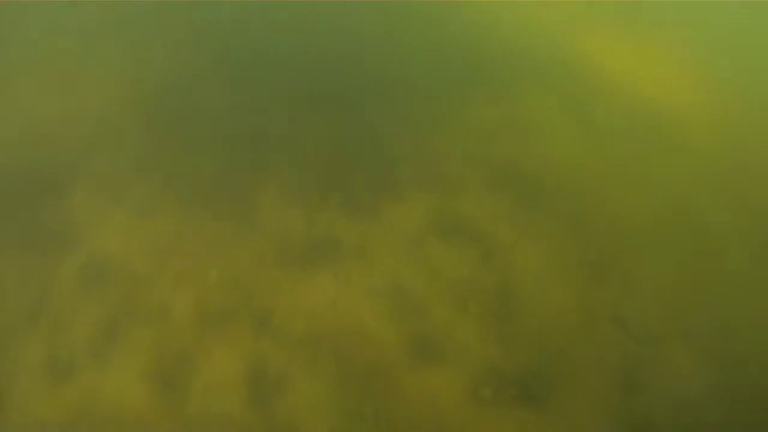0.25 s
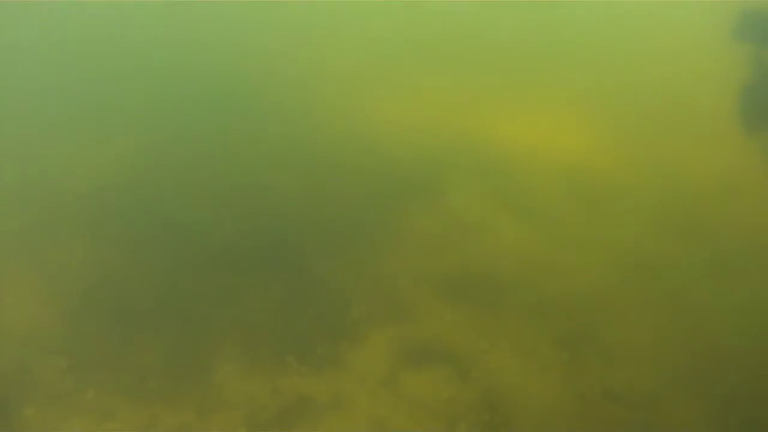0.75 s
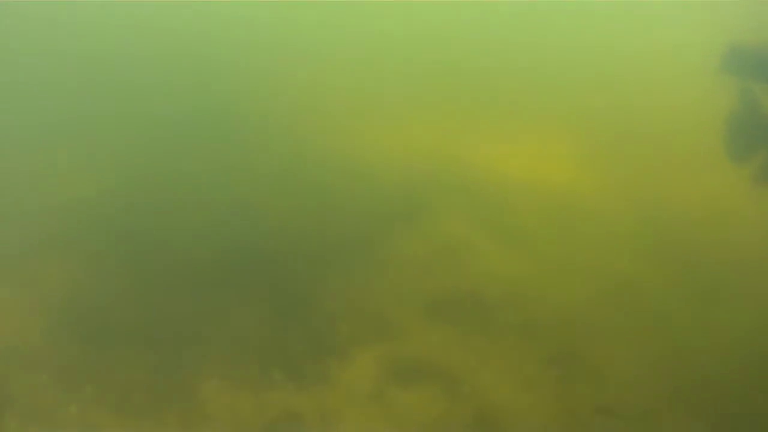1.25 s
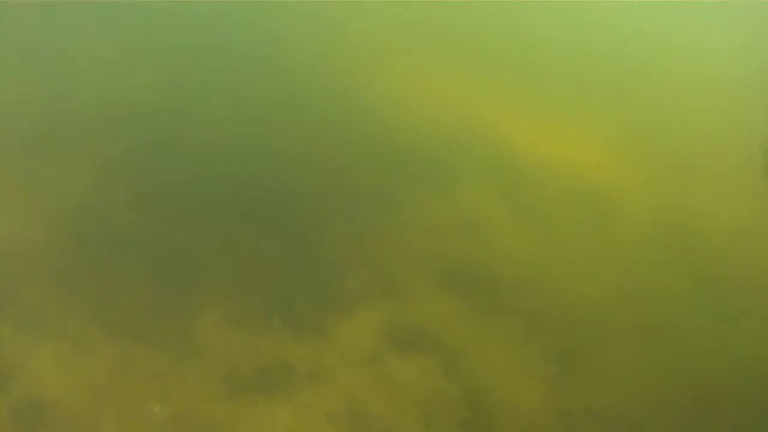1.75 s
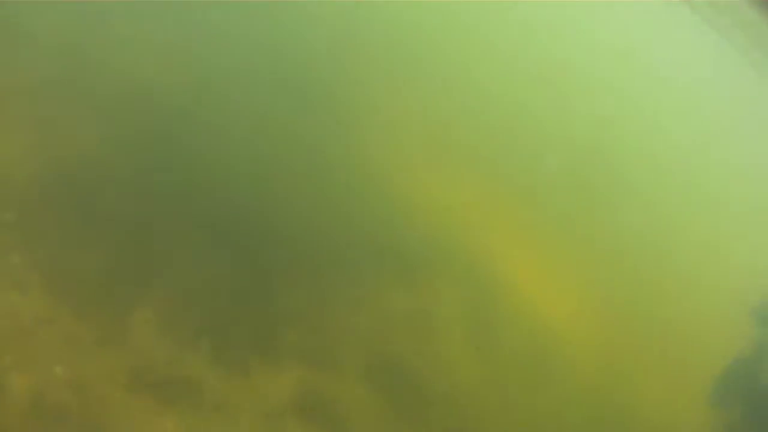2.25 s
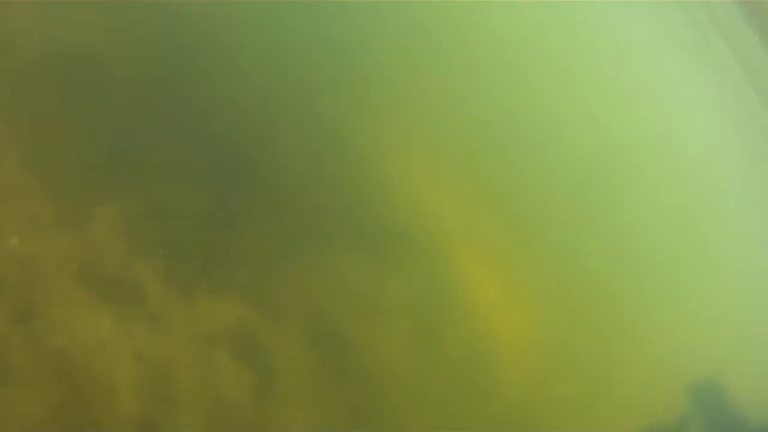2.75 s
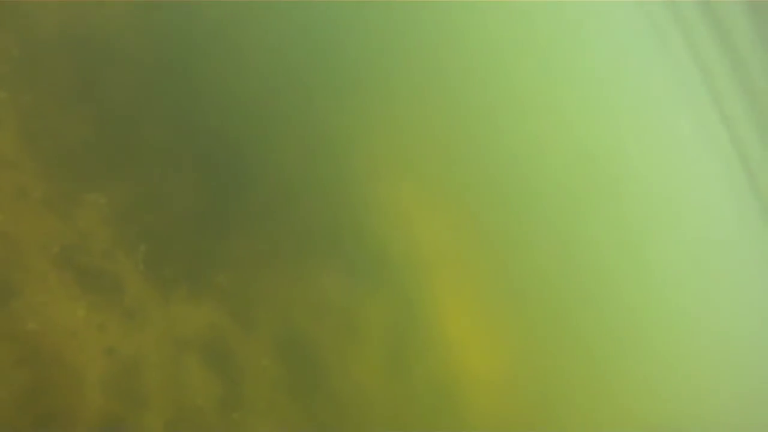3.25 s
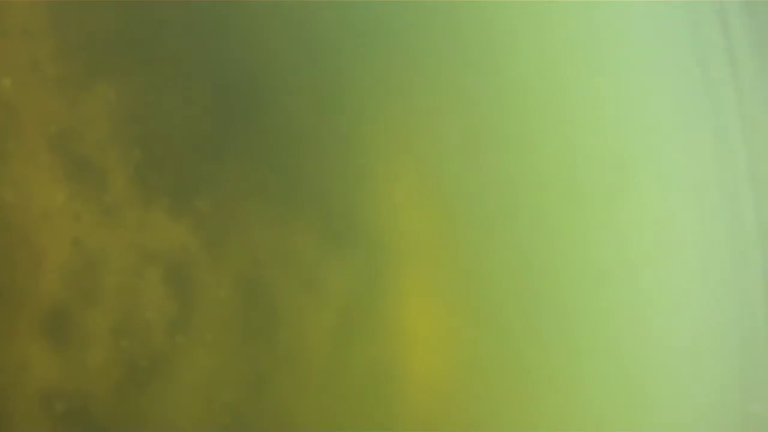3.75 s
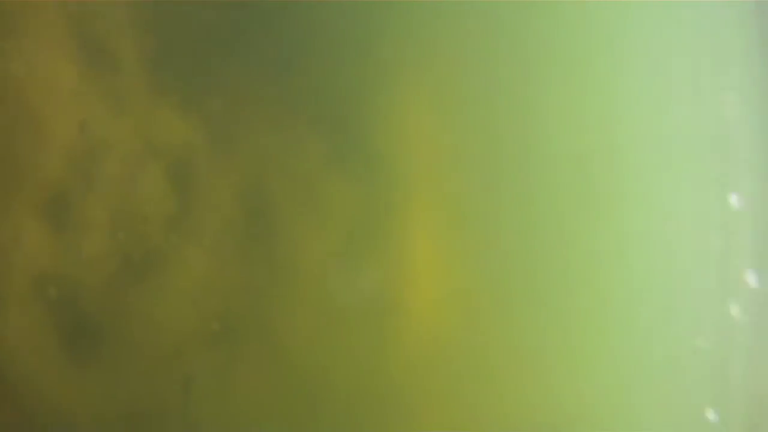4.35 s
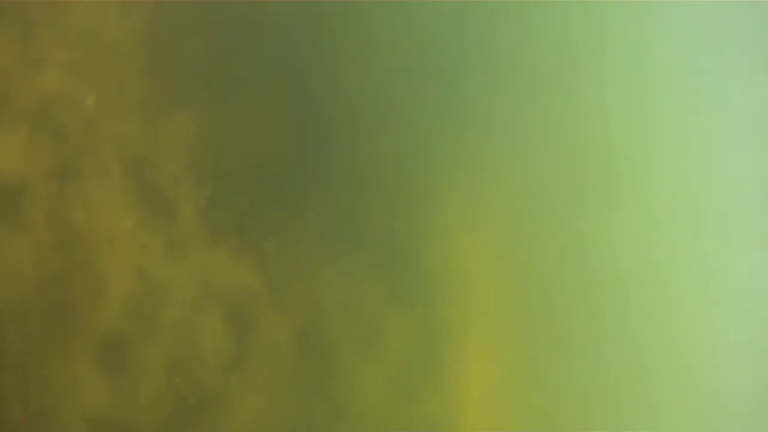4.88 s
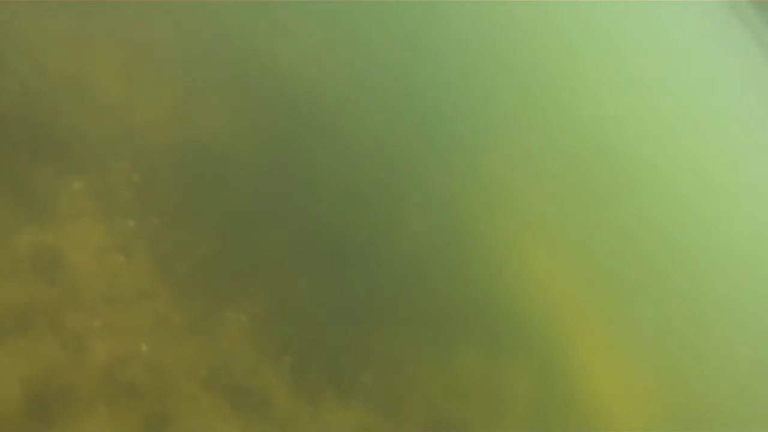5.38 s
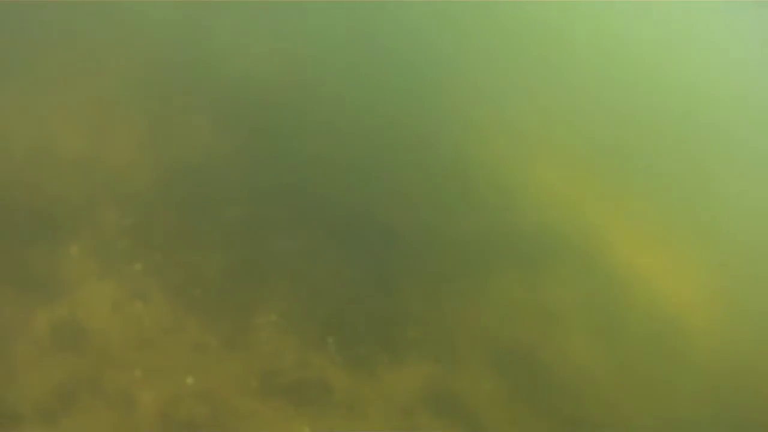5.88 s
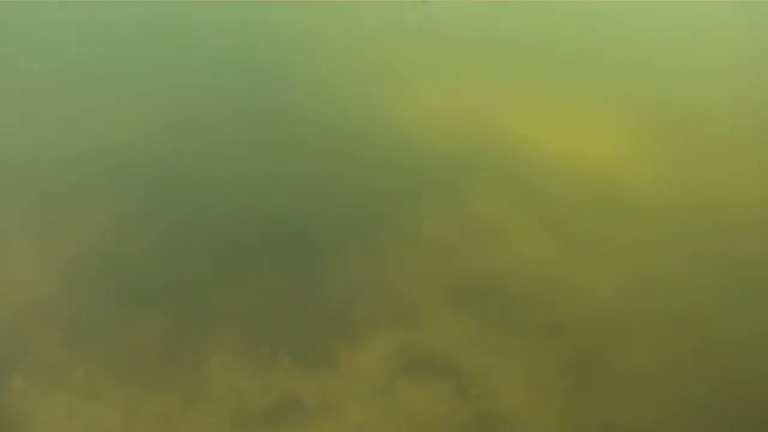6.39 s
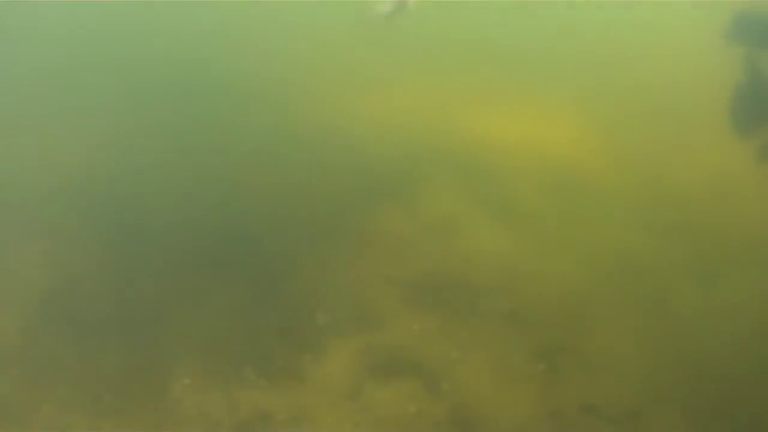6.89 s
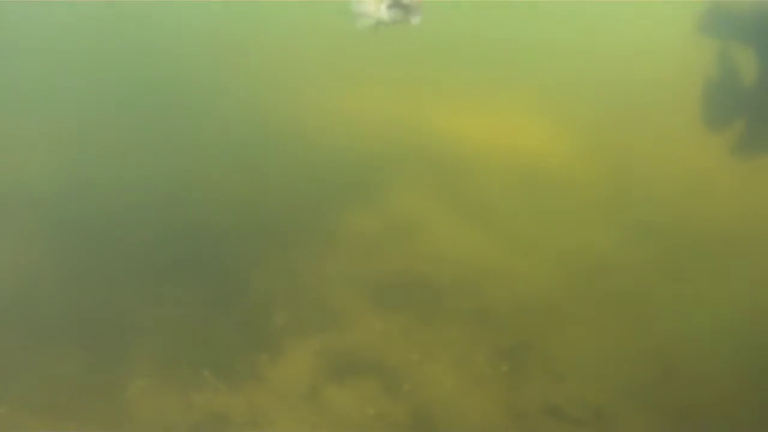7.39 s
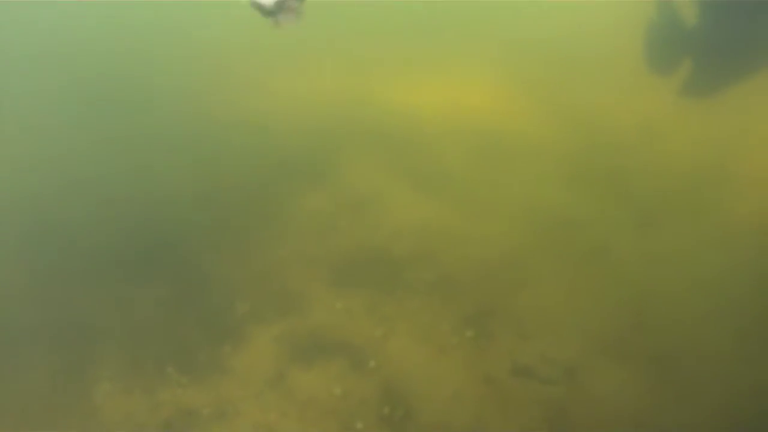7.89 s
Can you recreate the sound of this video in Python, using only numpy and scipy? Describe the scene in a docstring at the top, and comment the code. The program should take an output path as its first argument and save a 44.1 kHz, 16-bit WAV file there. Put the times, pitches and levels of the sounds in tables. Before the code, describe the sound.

Inside a sealed case held just underwater beside a dock, a very loud clipped pop comes almost at once, amid low bumps and wet scrapes. Sparse bubble plinks and knocks follow, with another sharp crack just after two seconds. A calmer middle of faint ticks and rumble gives way to busier pops and heavy thumps past six seconds, then quiet. The sound is close, boxy, low-fidelity, with glassy treble.

```python
"""Bubbles against a submerged case

A camera in a sealed case is held just under the water's surface beside a dock. Bubbles pop and ring against the
case as damped tones with noise splashes; noise-driven and struck modes make the grip's rubs and bumps. Moving
water rumbles and washes as shaped noise; a faint, dull flutter pulses about ten times a second. The coarse
recorder clips overloads and holds its slow samples, which mirrors the sound into a glassy treble."""
import sys
import numpy as np
from scipy import signal
from scipy.fft import rfft, irfft, next_fast_len
from scipy.io import wavfile
from scipy.ndimage import uniform_filter1d

SR = 44100
rng = np.random.default_rng(int(sys.argv[2]) if len(sys.argv) > 2 else 0)


def persist_wave(psi):
    """Save psi, clipped to +-1, as 16-bit WAV."""
    counts = np.round(np.clip(psi, -1, 1) * 32767).astype(np.int16)
    wavfile.write(sys.argv[1], SR, np.atleast_2d(counts).T)


N = 358533
TIME = np.arange(N) / SR  # s

# larger bubbles bursting at the case: onset t/s, mid-glide pitch f/Hz, short-term peak level/dB,
# ring decay t60/s, splash level/dB re the ring
BURSTS = [(0.2043, 1512, 10.5, 0.0098, -14), (0.2047, 940, 2.5, 0.017, -25), (0.2057, 396, 1, 0.0031, 3),
          (0.2954, 3610, -13, 0.022, -20), (0.3037, 1040, -17, .032, -17), (0.3408, 1880, -12, 0.011, -22),
          (0.5775, 3550, -34, 0.023, 1), (0.641, 3694, -17.5, 0.016, -9), (0.9108, 2670, -15, 0.0062, -1),
          (1.1138, 1070, -15, 0.029, -16), (1.1262, 1385, -2, 0.035, -1.5), (1.1311, 686, -7, 0.036, -11),
          (1.2792, 820, -28, 0.015, 1), (1.3758, 715, -20.5, 0.027, -6), (1.4015, 2200, 3, 0.0087, -16),
          (1.41, 2270, -14, 0.015, -35), (1.434, 2320, -5, 0.0067, 1.5), (1.4426, 2280, 0, .013, -0.5),
          (1.4502, 3600, -25, 0.014, 4), (1.4629, 620, -16, 0.014, -10), (1.5375, 2210, -25.5, .013, -1),
          (1.5683, 2120, -23.5, 0.014, -3), (1.6717, 486, -15.5, 0.056, -25),
          (1.6801, 670, -16.5, 0.036, -35), (1.7205, 506, -24, .069, -11), (1.7215, 990, -23.5, 0.022, -24),
          (1.8479, 952, -19.5, 0.05, -20), (2.0518, 1770, -19, 0.041, -26.5),
          (2.0934, 1175, -25, 0.11, 0.5), (2.1946, 3363, 6, 0.0094, -10), (2.2954, 2200, -25, .013, 4),
          (2.3355, 2860, -16, 0.025, -8), (2.39, 1090, -35, .025, 5), (2.4855, 690, -24, 0.028, -24),
          (2.7269, 2400, -28.5, 0.011, 4), (2.7866, 2360, -17, 0.011, -1.5), (2.8077, 1640, -26, 0.03, 6),
          (2.8286, 2494, -9.5, 0.015, 0.5), (2.8432, 2280, -18.5, 0.038, 5), (2.844, 4930, -22, .008, -14),
          (2.8603, 3850, -18.5, 0.019, 6), (2.8835, 840, -22.5, 0.052, -20), (2.8865, 2200, -18, 0.017, -1),
          (2.8901, 1250, -20.5, 0.024, -26), (2.9264, 2420, -11.5, 0.016, 0),
          (2.9961, 2400, -34.5, 0.012, 6), (3.5496, 2950, -20.5, 0.0095, 4.5),
          (3.6616, 2120, -27.5, 0.016, 1.5), (3.6983, 730, -25.5, 0.026, -3.5),
          (3.7745, 1620, -29, .032, 8), (4.3399, 3530, -25.5, 0.022, -5.5), (4.47, 1780, -33.5, .013, 9),
          (4.6058, 2285, -5.5, 0.026, -19), (4.6313, 2660, -21.5, 0.012, 7), (4.6383, 3910, -12, 0.015, 5),
          (4.649, 2150, -7.5, 0.019, -15), (4.6902, 616, -23, 0.045, 7), (4.7037, 2260, -24.5, 0.015, 1),
          (4.7199, 1950, -17.5, .03, -12), (5.3868, 936, -28.5, 0.02, -14.5),
          (5.6318, 1560, -29, 0.014, 12), (5.6717, 826, -20.5, 0.042, 2), (5.6719, 5130, -17, 0.0043, -30),
          (5.8711, 2640, -24, .013, -9.5), (6.2757, 2400, -27, .025, 6), (6.2852, 1195, -3, 0.025, -27),
          (6.3437, 3780, -23.5, 0.037, 2), (6.3525, 1730, -11.5, 0.014, -6), (6.3715, 2180, -6, 0.014, 12),
          (6.3749, 1580, -7, 0.015, 5), (6.3815, 4160, -11.5, 0.023, 1.5), (6.3874, 2300, -12, 0.017, 2),
          (6.4583, 5000, -20, 0.0035, -11.5), (6.6628, 793, -6, 0.036, -26), (6.6655, 644, -10, 0.024, -27),
          (6.7637, 3660, -35.5, 0.02, -2), (6.8191, 700, -20.5, 0.044, 6.5),
          (6.8625, 1850, -21.5, 0.012, -24), (6.9167, 777, -25.5, .03, -13),
          (6.9543, 895, -18, 0.012, -8.5), (6.9646, 2230, -25.5, .013, -18),
          (6.9733, 1610, -24, 0.011, -18), (7.1915, 875, -14.5, 0.016, -16), (7.302, 3700, -37.5, .014, 2),
          (7.345, 1690, -35.5, .013, -9)]
# bumps of the grip: onset t/s, peak level/dB, extra upper-mode level/dB, heave level/dB before a common gain,
# looseness of the grip [factor on the decay of the mount modes]
GRIP_BUMPS = [(0.011, -19, 1, -7.5, 2.7), (0.094, -20.5, -24, -6.5, 0.57), (0.301, -25, 1.5, -10, 0.6),
              (0.47, -27, 1, -15, 0.65), (1.128, -14.5, 14, -13, 1.3), (1.311, -21, 13, -12, 1.2),
              (1.517, -28.5, 11.5, -24, 2.2), (1.681, -18, -15, -3, 0.52), (1.823, -16.5, -7, 2, 0.76),
              (2.124, -29.5, -20.5, 14.5, .6), (2.75, -39, -15, 10, 0.7), (2.939, -17.5, 5.5, -4, 0.43),
              (3.70, -31, -8, -4, 1.2), (3.858, -21, 5, -3, 0.6), (4.153, -35, 15.5, 3.5, 0.81),
              (4.887, -14.5, -17, -2, 0.9), (5.169, -27.5, -3.5, -6, 0.56), (5.432, -20.5, 0, 7.5, 2),
              (5.709, -24, 7, 5, 0.58), (5.947, -21, 4.5, 2.5, 1), (6.181, -11, 8, 4, 1),
              (6.213, -13.5, -17, 0.5, 1.07), (6.663, -8, 5, -1.5, 0.47), (6.922, -23, 1, 8, 1),
              (6.974, -20, 0, 4, 0.67), (7.172, -9.5, 7.5, 8, 1.06), (7.287, -25.5, -4, 2, 1.15)]
# modes of the case on its mount: f/Hz, relative level/dB, decay t60/s at looseness 1
MOUNT_MODES = [(85.45, 5.5, 0.2), (133.8, -10.5, 0.35), (221.4, -35.5, 0.74)]


def undb(db):
    """Level law: decibels to amplitude gain."""
    return 10 ** (np.asarray(db) / 20)


def unit(x):
    """Normalisation of power: scale to rms 1."""
    return x / np.sqrt(np.mean(x ** 2))


def curves(table):
    """Linear interpolation: each column of a table as a line through time."""
    s, *columns = np.transpose(table)
    return [np.interp(TIME, s, column) for column in columns]


def add(out, s, sound):
    """Superposition: mix a sound in at time s."""
    i = max(int(s * SR), 0)
    out[i:i + len(sound)] += sound[:N - i]


def colour(x, points):
    """Spectral shaping: filter by level/dB points joined along log frequency."""
    hz, db = np.transpose(points)
    size = next_fast_len(len(x))
    f = np.maximum(np.fft.rfftfreq(size, 1 / SR), 1)
    gain = undb(np.interp(np.log(f), np.log(hz), db))
    return irfft(rfft(x, size) * gain, size)[:len(x)]


def ring(t, hz, t60):
    """Free oscillation: a sine decaying by 60 dB in t60, at least 2 ms."""
    return np.sin(2 * np.pi * hz * t) * np.exp(-np.log(1000) * t / max(t60, .002))


def resonate(x, hz, t60):
    """Forced oscillation: drive one damped mode; the result has rms 1."""
    pole = np.exp((2j * np.pi * hz - np.log(1000) / t60) / SR)
    return unit(signal.lfilter([1], [1, -pole], x).imag)


def walk(rate):
    """Band-limited fluctuation: smoothed random steps, rate per second, with rms 1."""
    k = max(int(SR / rate), 2)
    steps = np.repeat(rng.standard_normal(N // k + 1), k)
    return unit(uniform_filter1d(steps, k)[:N])


def swell(start, length, attack, release):
    """Exponential relaxation: rise to 1 at the start, hold, and die away; all in seconds."""
    before = np.minimum(TIME - start, 0)
    after = np.maximum(TIME - start - length, 0)
    return np.exp(before / attack - after / release)


def gurgle(x):
    """Selective transmission: shifting pockets of water and air favour ever-changing narrow bands."""
    size = next_fast_len(N)
    spectrum, f = rfft(x, size), np.fft.rfftfreq(size, 1 / SR)
    place = 5 * np.log2(1 + f / 500)  # band number, widening with frequency
    out = 0
    for band in range(18):
        share = np.clip(1 - np.abs(np.minimum(place, 17) - band), 0, 1)
        out = out + irfft(spectrum * share, size)[:N] * undb(3.4 * walk(30))
    return unit(out)


def wash(level_db=-67):
    """Broadband flow noise: the water's steady wash is coloured noise with gurgling bands."""
    # spectrum of the wash: f/Hz, relative level/dB
    wash_spectrum = [(100, -4), (200, 1), (450, 1), (900, -9.5), (1500, -5.5), (2500, -11), (4000, -18.5)]
    return undb(level_db) * gurgle(colour(rng.standard_normal(N), wash_spectrum))


def hiss(level_db=-68):
    """Stationary noise: the recorder's hiss is random and coloured."""
    # spectrum of the hiss: f/Hz, relative level/dB
    hiss_spectrum = [(100, -12), (1000, -18.5), (2500, 7), (5500, 4.5)]
    return undb(level_db) * unit(colour(rng.standard_normal(N), hiss_spectrum))


def flow_level():
    """Addition of powers: level/dB of the steady flow and the wake of eddies behind each bump."""
    # steady flow past the case: t/s, level/dB
    steady_flow = [(0, -45), (0.35, -44), (1.0, -47.5), (1.4, -41.5), (2.0, -48.5), (2.45, -43.5),
                   (3.2, -44.5), (3.9, -40), (4.4, -41), (4.8, -38.5), (5.3, -45.5), (5.75, -46.5),
                   (6.4, -36.5), (6.85, -49), (7.4, -39), (7.7, -48.5), (8.13, -49.5)]
    wake_db, attack_s, release_s = -17, 0.0087, .05  # wake level re the bump's peak
    steady_db, = curves(steady_flow)
    power = undb(steady_db) ** 2
    for s, db, *_ in GRIP_BUMPS:
        power = power + (undb(db + wake_db) * swell(s, 0, attack_s, release_s)) ** 2
    return 10 * np.log10(power)


def rumble(mount_db=-6):
    """Turbulent excitation: eddies press on the case and keep its mount trembling."""
    # spectrum of the eddy pressure: f/Hz, relative level/dB
    eddy_spectrum = [(10, -13), (22, 1.5), (45, -7.5), (70, -5.5), (110, -9.5), (170, -20.5), (300, -34.5),
                     (600, -35), (1500, -50.5)]
    db = flow_level()
    eddies = rng.standard_normal(N)
    mount = sum(undb(mode_db) * resonate(eddies, hz, t60) for hz, mode_db, t60 in MOUNT_MODES)
    pressure = unit(colour(rng.standard_normal(N), eddy_spectrum))
    flow = pressure + undb(mount_db) * unit(mount)
    # the strength of the flow, not chance, sets the slow swell
    return flow / np.sqrt(uniform_filter1d(flow ** 2, size=SR // 8)) * undb(db)


def grip(uneven_db=2):
    """Addition of powers: level and power-weighted brightness/dB of slides over an uneven creep."""
    # faint rubbing between slides, as the grip creeps and at last settles: t/s, level/dB
    creep = [(0, -48), (0.4, -45.5), (0.72, -56), (0.84, -48), (0.97, -55), (1.27, -55.5), (1.38, -39.5),
             (1.62, -59.5), (1.98, -66), (2.12, -52.5), (2.57, -62.5), (3.05, -59), (3.25, -57),
             (3.45, -62), (3.95, -53), (5.3, -59), (6.15, -51), (7.08, -57.5), (7.4, -58.5), (7.6, -69.5)]
    # slides of the grip over the case: start t/s, length t/s, level/dB, brightness/dB before a common lift
    slides = [(0.0, 0.071, -31, -0.5), (0.101, 0.084, -28, 5.5), (0.263, 0.042, -27.5, -2),
              (0.449, 0.035, -36.5, -2.5), (0.59, 0.056, -44.5, -12), (1.021, 0.0061, -42, -5.5),
              (1.123, 0.0092, -17, -15), (1.146, 0.058, -32.5, 1.5), (1.296, .025, -41.5, 3),
              (1.53, 0.02, -42, -16), (1.667, 0.005, -34, -8.5), (1.719, 0.005, -33, -6),
              (1.834, 0.018, -30.5, -7.5), (1.9, 0.035, -55, -18), (2.405, 0.11, -49.5, -6),
              (2.613, 0.12, -49, -1.5), (2.809, 0.044, -37.5, -0.5), (3.51, 0.017, -51, -6),
              (3.647, 0.013, -46, -8.5), (3.829, 0.069, -39, -5), (4.15, 0.018, -38, -8),
              (4.333, 0.09, -49.5, -3.5), (4.638, 0.017, -37, -7), (4.722, 0.026, -42, -1),
              (4.864, 0.0053, -40, -5), (4.929, 0.024, -41, -4.5), (5.046, 0.014, -49.5, -10),
              (5.15, 0.024, -38.5, -11), (5.416, 0.049, -39, -5), (5.491, 0.033, -37.5, -2.5),
              (5.58, 0.018, -51, -8), (5.716, 0.033, -41, 2.5), (5.948, 0.048, -33.5, -1.5),
              (6.178, 0.056, -28.5, -6), (6.371, 0.026, -34.5, -6), (6.649, .036, -30, -7.5),
              (6.701, 0.046, -42, -6), (6.95, 0.092, -45.5, -11), (7.171, 0.048, -34.5, -5),
              (7.242, 0.074, -45, -14)]
    creep_brightness_db, attack_s, release_s = -3.5, .009, .016
    creep_db, = curves(creep)
    power = undb(creep_db + uneven_db * walk(12)) ** 2
    brightness = power * creep_brightness_db
    for s, length, db, brightness_db in slides:
        slide = (undb(db) * swell(s, length, attack_s, release_s)) ** 2
        power = power + slide
        brightness = brightness + slide * brightness_db
    return 10 * np.log10(power), brightness / power


def rubbing(split_hz=1500, bright_db=4, slips_per_s=3000):
    """Stick-slip excitation: tiny slips of the wet grip drive the resonances of the case wall."""
    # spectrum of the direct rubbing: f/Hz, relative level/dB
    rub_spectrum = [(150, -8.5), (300, -20), (430, -9.5), (600, 5), (850, 7), (1100, -3.5), (1700, -5.5),
                    (2400, -8.5), (3200, -3.5), (4000, -10), (5000, -20.5)]
    # resonances of the case wall: f/Hz, relative level/dB, decay t60/s
    wall_modes = [(618.4, -14, 0.12), (700, -19, 0.28), (735, -19, 0.076), (1422, -16, 0.056),
                  (1531, -14.5, 0.014), (2170, -15.5, 0.018), (2770, -8, 0.0031)]
    db, brightness_db = grip()
    impulses = (rng.random(N) < slips_per_s / SR) * rng.standard_normal(N)
    slips = unit(impulses) + .5 * rng.standard_normal(N)
    wall = sum(undb(mode_db) * resonate(slips, hz, t60) for hz, mode_db, t60 in wall_modes)
    body = gurgle(unit(colour(slips, rub_spectrum)) + wall)
    lowpass = signal.butter(2, split_hz, fs=SR, output="sos")
    dull = signal.sosfiltfilt(lowpass, body)
    tilted = dull + undb(brightness_db + bright_db) * (body - dull)
    # the skin catches and lets go
    tilted = tilted * undb(1.3 * walk(110))
    # the hand's pressure sets the loudness, whichever band is favoured
    return tilted / np.sqrt(uniform_filter1d(tilted ** 2, size=SR // 12)) * undb(db)


def bumps(push_s=0.0091, heave_hz=55, heave_t60=0.059, heave_gain_db=12):
    """Modal superposition: a soft push heaves the case and swings its mount; a firm grip damps the mount."""
    out, t = np.zeros(N), TIME[:SR // 2]
    for s, db, upper_db, heave_db, loose in GRIP_BUMPS:
        lowest, *upper = [undb(mode_db) * ring(t, hz, t60 * loose) for hz, mode_db, t60 in MOUNT_MODES]
        heave = undb(heave_db + heave_gain_db) * ring(t, heave_hz, heave_t60)
        swing = lowest + undb(upper_db) * sum(upper) + heave
        swing = swing * (1 - np.exp(-t / push_s))
        add(out, s, -undb(db) * swing / np.abs(swing).max())
    return out


def flutter(level_db=-51.5):
    """Amplitude modulation: faint, dull noise pulses about ten times a second."""
    # spectrum of the flutter: f/Hz, relative level/dB
    flutter_spectrum = [(50, -0.5), (130, 3.5), (300, 2), (600, 0), (1300, -4), (1900, -18), (4000, -24)]
    period, first, width = .101, .031, .012  # s
    offset = (TIME - first + period / 2) % period - period / 2
    noise = unit(colour(rng.standard_normal(N), flutter_spectrum))
    # the level is that of the noise at the crest of a pulse
    return noise * np.exp(-(offset / width) ** 2) * undb(level_db)


def fizz(spread_db=5, spread_octaves=1.1, splash_db=1):
    """Random scatter: one tiny bubble follows each burst; its rows are laid out as in BURSTS."""
    longest_delay_s, middle_db, middle_hz, t60 = .06, -42, 1900, .02
    rows = []
    for s, *_ in BURSTS:
        wait, small, strong = rng.uniform(-1, 1, 3)
        hz = middle_hz * 2 ** (spread_octaves * small)
        rows.append((s + longest_delay_s * abs(wait), hz, middle_db + spread_db * strong, t60, splash_db))
    return rows


def bubbles(rise_s=0.0003, splash_t60=0.015, echo=0.15, sag=0.086, sag_s=0.0018,
            linger_db=-20, linger_t60=0.0095, hum_db=-29, hum_hz=600, hum_t60=0.069):
    """Bubble resonance: each rings at the pitch of its size, with a splash and a faint hum of the wall."""
    # spectrum of a splash: f/Hz, relative level/dB
    splash_spectrum = [(100, -16), (350, -30.5), (650, -3), (1500, -0.5), (2500, 2), (3800, -9.5),
                       (5200, -13.5)]
    out, t = np.zeros(N), TIME[:SR // 6]
    bursts = BURSTS + fizz()
    lags = rng.uniform(.002, .0045, len(bursts))  # s
    spray = colour(rng.standard_normal(len(bursts) * len(t)), splash_spectrum).reshape(-1, len(t))
    # a fresh bubble starts sharp by half the sag and falls flat by half as it rounds off
    settling = t * (1 - sag / 2) + sag * sag_s * (1 - np.exp(-t / sag_s))
    for (s, hz, db, t60, splash_db), lag, noise in zip(bursts, lags, spray):
        # a wide swing dies fast and a small one lingers, so the tail stops growing with the hardest bursts
        tail_db = min(-4 - db, 0)
        tone = ring(settling, hz, t60) + undb(linger_db + tail_db) * ring(settling, hz, linger_t60)
        tone = tone * (1 - np.exp(-(t / rise_s) ** 2))
        splash = noise * np.exp(-np.log(1000) * t / splash_t60) * (1 - np.exp(-t / rise_s))
        pop = unit(tone) + undb(splash_db) * unit(splash)
        # the surface sends it back upside down
        pop = pop - echo * np.interp(t - lag, t, pop, left=0)
        # amplitude of a sine as strong as the loudest millisecond
        peak = np.sqrt(2 * uniform_filter1d(pop ** 2, size=44).max())
        hum = undb(hum_db + tail_db) * ring(t, hum_hz, hum_t60)
        add(out, s, undb(db) * (pop / peak + hum))
    return out


def scene():
    """Linear superposition: all sounds add at one microphone, given to both channels."""
    mono = wash() + hiss() + rumble() + rubbing() + bumps() + flutter() + bubbles()
    return np.array([mono, mono])


def record(dry, ceiling=1.0, noise_db=-79):
    """Sample-and-hold imaging: slow held samples mirror the sound about their rate; overloads clip."""
    sample_hz, top_hz = 12000, 15400
    band_filter = signal.butter(8, 5300, fs=SR, output="sos")
    band = signal.sosfilt(band_filter, dry)
    samples = np.clip(signal.resample_poly(band, sample_hz, SR, axis=1), -ceiling, ceiling)
    # each sample is held for eight finer steps
    held = signal.resample_poly(np.repeat(samples, 8, axis=1), SR, 8 * sample_hz, axis=1)
    held = np.clip(held, -1, 1) + undb(noise_db) * rng.standard_normal(N)
    top_filter = signal.ellip(10, .2, 80, top_hz, fs=SR, output="sos")
    return signal.sosfilt(top_filter, held)


dry = scene()
out = record(dry)
persist_wave(out)
```